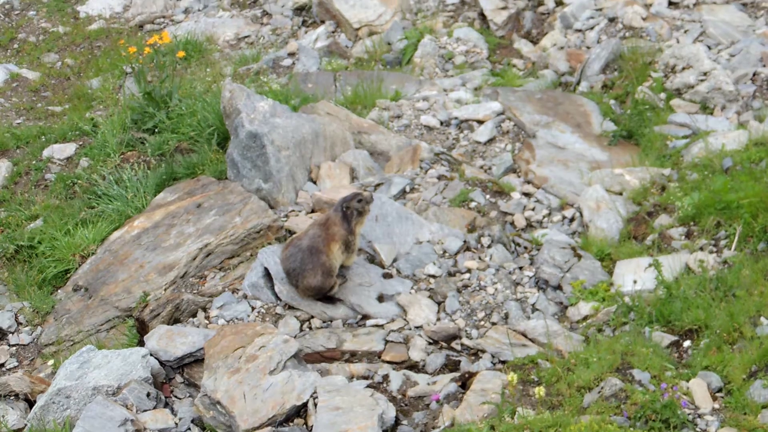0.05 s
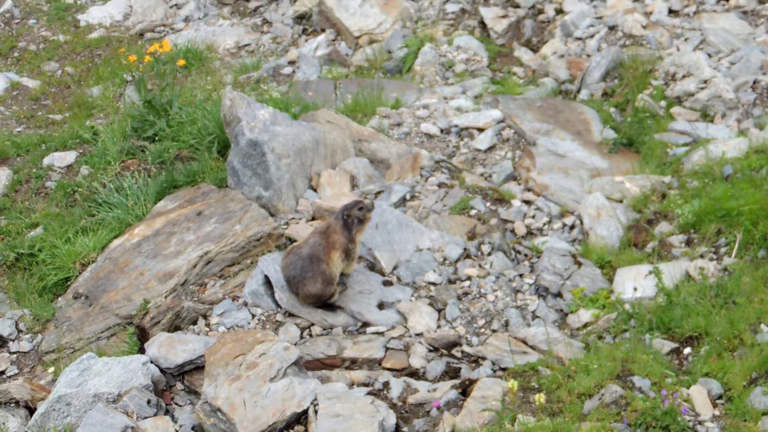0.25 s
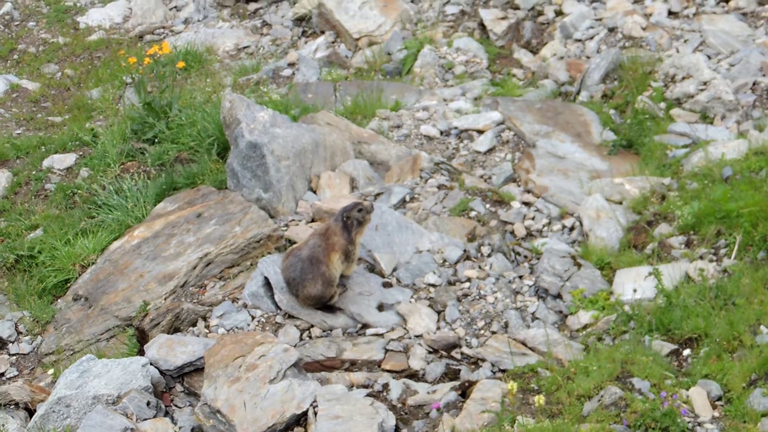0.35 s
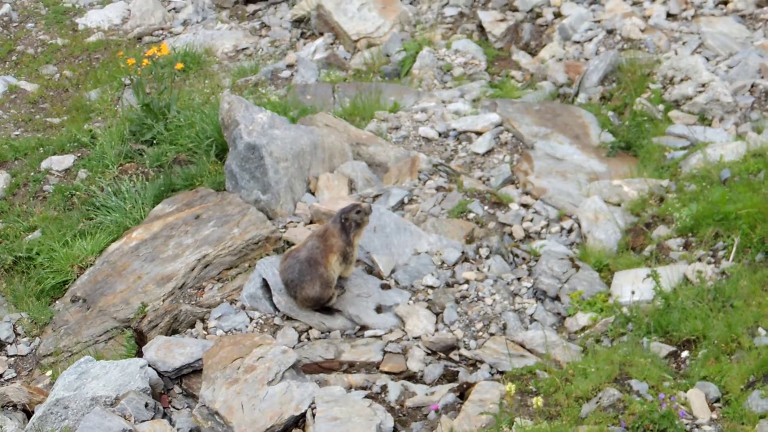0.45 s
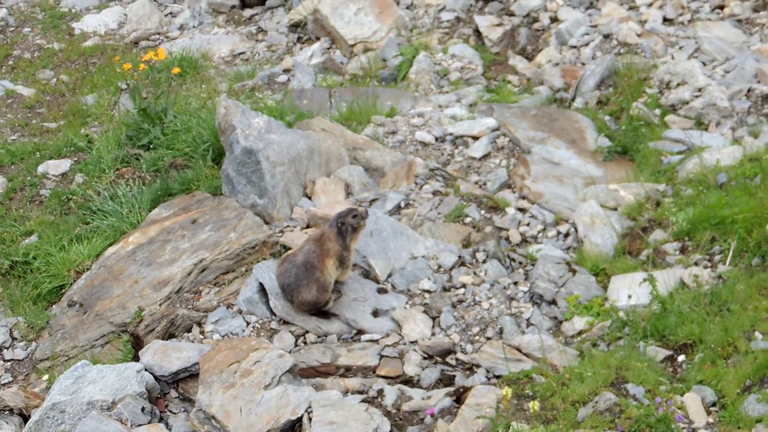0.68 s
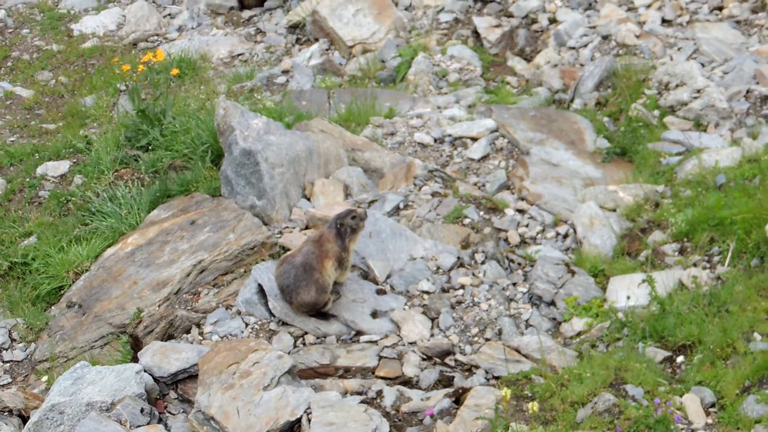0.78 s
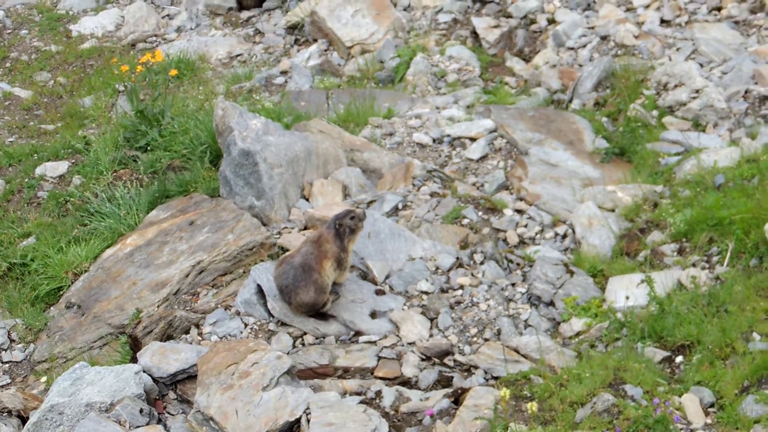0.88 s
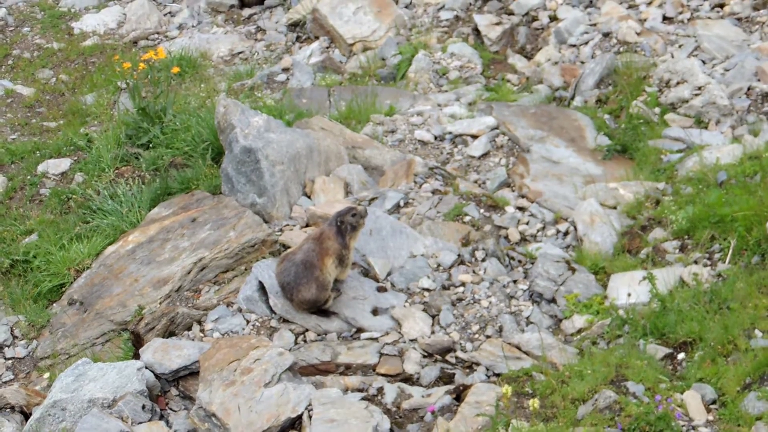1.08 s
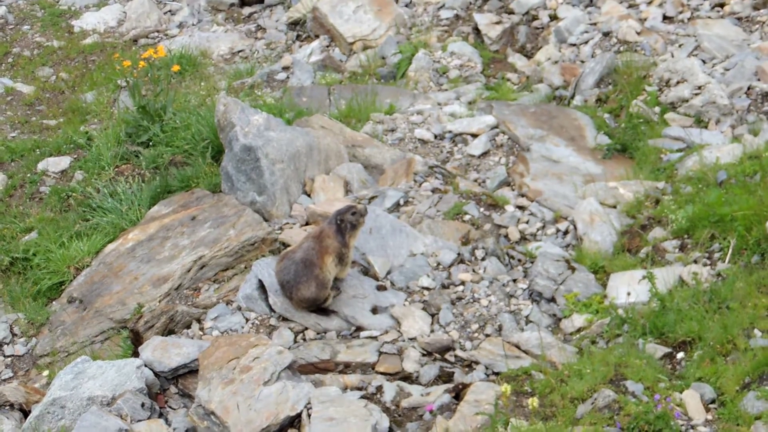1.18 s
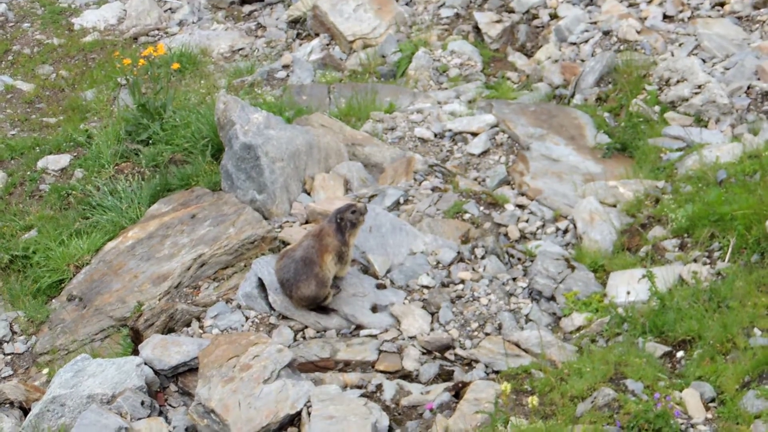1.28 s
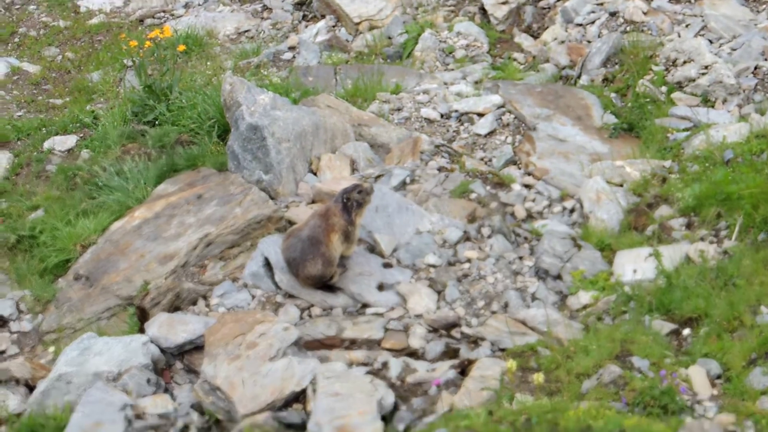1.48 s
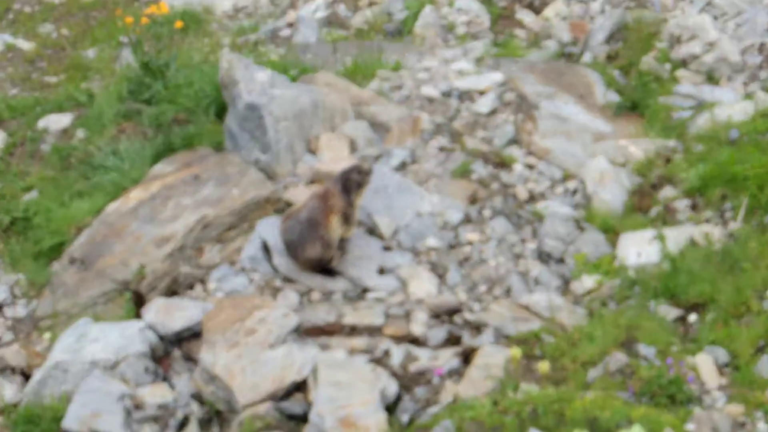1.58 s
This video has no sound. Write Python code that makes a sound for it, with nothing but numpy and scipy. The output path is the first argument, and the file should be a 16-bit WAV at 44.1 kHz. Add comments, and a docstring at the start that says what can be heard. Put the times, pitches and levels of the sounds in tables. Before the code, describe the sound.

A marmot whistles once at about 0.25 seconds, a shrill call that leaps up in pitch, arches and sags away by 0.4 seconds, leaving a faint echo off the rocky slope. Wind rumbles on the microphone throughout, with soft thumps around 0.2, 0.8 to 1.0 and 1.3 seconds. Distant water hisses over a very faint hum until the end, at about 1.6 seconds.

```python
"""A marmot on a scree slope gives one shrill whistle that leaps up in pitch, arches and sags away.
A nearby boulder and loose stones reflect it, and the far slope returns a faint echo.
In the distance water hisses throughout over a faint hum.
Right at the microphone, gusts buffet the two ports with a low rumble and a few thumps."""
import sys
import numpy as np
from scipy import signal
from scipy.fft import rfft, irfft, next_fast_len
from scipy.io import wavfile
from scipy.ndimage import uniform_filter1d, minimum_filter1d, map_coordinates

SR = 44100
rng = np.random.default_rng(int(sys.argv[2]) if len(sys.argv) > 2 else 0)


def master(y):
    """Save y as 16-bit WAV."""
    cut = np.clip(np.atleast_2d(y).T, -1, 1)
    pcm = np.round(cut * 32767)  # scale
    wavfile.write(sys.argv[1], SR, pcm.astype(np.int16))


N = 72765

# the whistle's glide (time [s], pitch [Hz])
WHISTLE_PITCH = [(.238, 1020), (.25, 1527), (.258, 1934), (.262, 2253), (.267, 2242), (.273, 2357),
                 (.282, 2465), (.292, 2499), (.302, 2442), (.31, 2369), (.32, 2293), (.334, 2093),
                 (.348, 1915), (.366, 1780)]
# its envelope, before the trims (time [s], fundamental [dB], octave [dB])
WHISTLE_LEVELS = [(0.239, -33, -38), (0.248, -30.5, -29.5), (.255, -19, -20.5), (0.257, -19.5, -8.5),
                  (0.2605, -6, -21), (0.267, -5.5, -17), (0.27, -2.5, -38.5), (0.282, -10, -32),
                  (.294, -12.5, -36), (.303, -15, -51), (0.309, -11.5, -46), (0.323, -10, -37),
                  (.333, -20, -51), (.345, -34.5, -37.5), (0.368, -45, -63)]
# its upper overtones (frequency [Hz], level against the fundamental [dB])
OVERTONES = [(5000, -16), (6600, -33.5), (7100, -29), (7500, -30), (8000, -39), (9300, -36), (9900, -26),
             (10800, -42), (12100, -31), (13500, -49)]
# air noise in the call (frequency [Hz], relative density [dB])
RASP_COLOUR = [(300, -16), (700, -14), (1500, 8.5), (3000, 6.5), (5500, 0), (9000, -8), (14000, -18)]
# the direct call's balance at the microphone (time [s], left minus right [dB])
CALL_PAN = [(.265, 2.5), (.272, -5), (.282, -6), (.305, -7.5), (.32, 1)]
# its phase between the ports (frequency [Hz], left lead [rad])
CALL_PHASE = [(1200, -0.46), (2400, -0.76), (4500, -0.43), (10000, -1.33)]
# wind on the ports (time [s], left [dB], right [dB])
GUSTS = [(0.0, -27.5, -31.0), (0.1, -23.5, -25), (0.195, -29.5, -25), (0.225, -26.5, -15.5),
         (0.335, -24.5, -20), (0.4, -28.5, -25.5), (0.48, -26.5, -23), (0.53, -28, -19), (0.59, -22.5, -28),
         (0.68, -22.0, -18), (0.79, -26, -21.5), (0.84, -24, -20), (0.88, -19.5, -16), (0.95, -20.5, -20.5),
         (1.03, -24.5, -24), (1.12, -23.0, -29), (1.19, -22, -17.5), (1.25, -24.5, -26.5),
         (1.36, -23.5, -28.5), (1.43, -25, -23.5), (1.48, -28, -21), (1.52, -28, -28.5),
         (1.59, -24.0, -24.5), (1.65, -26.5, -30)]
# low buffeting, before its roll-offs (frequency [Hz], relative density [dB])
RUMBLE_COLOUR = [(20, -3.5), (45, -0.5), (85, -1), (150, -3), (220, -9.5), (330, -17.5), (500, -29.5),
                 (900, -24), (1500, -90)]
# flutter that rises with the gusts (frequency [Hz], relative density [dB])
FLUTTER_COLOUR = [(150, 4.5), (300, 11), (520, 4.5), (900, -36), (2500, -40)]
# the hardest eddies (time [s], left gain [dB], right gain [dB], puff against the swing [dB])
THUMPS = [(.224, -29, -17.5, 0), (.763, -17, -7, -22), (0.811, -16.5, -10.5, -6.5), (0.899, -15, -17.5, -3),
          (0.951, -28, -13, -4), (1.283, -11, -37, -11.5), (1.372, -15, -41, -7), (1.598, -27, -15, -38)]
# noise stirred up by an eddy (frequency [Hz], relative density [dB])
PUFF_COLOUR = [(60, 1), (180, 7.5), (350, -1.5), (550, -5), (900, -32), (2000, -57)]
# swells of the distant water (time [s], relative level [dB])
WATER_SWELL = [(0, -45.5), (.12, -44), (.2, -42), (.28, -44), (.4, -47.5), (.68, -47), (.8, -44),
               (.95, -43), (1.12, -42), (1.25, -42.5), (1.39, -42), (1.44, -45.5), (1.65, -45.5)]
# its hiss (frequency [Hz], relative density [dB])
WATER_COLOUR = [(180, -6.5), (320, -5), (500, -8.5), (700, -9), (980, -6), (1350, -12), (2400, -13.5),
                (3500, -18.5), (5500, -19), (6600, -18.5), (10000, -24.5), (14000, -30.5)]
# its likeness at the two ports (frequency [Hz], coherence [0-1])
WATER_COHERENCE = [(300, 1), (700, 0.83), (2000, 0.095), (4000, 0.071), (8000, 0.17), (13000, 0.046)]
# its balance (frequency [Hz], left minus right [dB])
WATER_PAN = [(300, 2), (1000, 0.5), (3000, -0.5), (8000, -4), (13000, -4)]
# lines of the far hum (harmonic [number], level [dB])
HUM_LINES = [(4, -46), (5, -55), (7, -54), (12, -57)]


def whistle(jitter=.011, jitter_rate=700, shimmer_db=.6, smear_rad=.5, smear_rate=800,
            break_s=.261, break_fade_s=.0036, octave_trim_db=1, trim_db=-.5):
    """The marmot's rough upward leap, rich in overtones, breaks into a clearer, fluttering tone."""
    t = np.arange(N) / SR
    hz, = curves(WHISTLE_PITCH)
    level_db, octave_db = curves(WHISTLE_LEVELS)
    leap = np.clip((break_s - t) / break_fade_s + .5, 0, 1)  # 1 before the break, 0 after
    phase = 2 * np.pi * np.cumsum(hz * (1 + jitter * wobble(jitter_rate))) / SR
    upper = 0
    for k in range(3, 7):
        overtone_db = along(OVERTONES, k * hz) + 3 * wobble(340)  # each flickers on its own
        upper += amp(overtone_db) * np.sin(k * phase + smear_rad * wobble(smear_rate))
    octave = np.sin(2 * phase + smear_rad / 2 * wobble(smear_rate))
    third = leap * amp(-18.5) * np.sin(3 * phase)
    tone = amp(level_db) * (np.sin(phase) + upper) + amp(octave_db + octave_trim_db) * (octave + third)
    gate = np.clip(np.minimum(t - WHISTLE_LEVELS[0][0], WHISTLE_LEVELS[-1][0] - t) / .0016, 0, 1)
    shimmer = amp(shimmer_db * wobble(jitter_rate))
    roughness = 1 + .14 * leap * wobble(900)
    return np.sqrt(2) * tone * gate * shimmer * roughness * amp(trim_db)


def rasp(peak_s=.2576, width_s=.015, level_db=-27.5):
    """A short burst of air noise opens the marmot's call."""
    burst = np.exp(-np.abs(np.arange(N) / SR - peak_s) / width_s)
    return noise(RASP_COLOUR, N) * amp(level_db) * burst


def among_rocks(call):
    """The call reaches the microphone directly, then off a boulder, the scree and the far slope."""
    side = np.array([[1], [-1]])
    direct = filtered(call, lambda hz: np.exp(.5j * side * along(CALL_PHASE, hz)))
    direct *= amp(side * curves(CALL_PAN) / 2)
    scree = amp(-21) * scatter(call, t60_s=.045)
    slope = amp(-28) * scatter(call, t60_s=2.2)
    return direct + boulder(call) + scree + slope


def boulder(call, delay_s=.0205, rough_hz=3020, left_db=-23, right_db=-25):
    """A nearby rock face mirrors the call; above rough_hz it is too rough to mirror well."""
    mirror = lambda hz: np.exp(-2j * np.pi * hz * delay_s) / np.sqrt(1 + (hz / rough_hz) ** 8)
    return filtered(call, mirror) * amp([[left_db], [right_db]])


def scatter(call, t60_s):
    """Many stones return a diffuse tail, different at each port."""
    t = np.arange(SR) / SR
    tail = rng.standard_normal((2, SR)) * amp(-60 * t / t60_s)
    return signal.fftconvolve(call[None], tail / np.linalg.norm(tail[0]), axes=1)[:, :N]


def wind(lumps_db=1.26, lump_rate=28, low_hz=18, edge_hz=420, flutter_db=-46, flutter_growth=1.03):
    """Gusts buffet each microphone port separately: a lumpy rumble with a lighter flutter on top."""
    def colour(hz):
        low_cut = 1 - np.exp(-(hz / low_hz) ** 2)
        return amp(along(RUMBLE_COLOUR, hz)) * low_cut / np.sqrt(1 + (hz / edge_hz) ** 4)

    gust_db = curves(GUSTS) + lumps_db * np.array([wobble(lump_rate), wobble(lump_rate)])
    rumble = unit(filtered(rng.standard_normal((2, N)), colour)) * amp(gust_db)
    flutter = noise(FLUTTER_COLOUR) * amp(flutter_db + flutter_growth * (gust_db - gust_db.mean()))
    return rumble + flutter


def thumps(half_swing_s=.0027, half_puff_s=.0081):
    """An eddy crossing a port gives one swing of pressure and a short puff of noise."""
    ports, t = np.zeros((2, N)), np.arange(N) / SR
    air = noise(PUFF_COLOUR)
    for at_s, left_db, right_db, puff_db in THUMPS:
        crossing = (t - at_s) / half_swing_s
        swing = 2 * crossing * np.exp(-crossing ** 2)
        puff = amp(puff_db) * air * np.exp(-((t - at_s) / half_puff_s) ** 2)
        ports += amp([[left_db], [right_db]]) * (swing + puff)
    return ports


def water(low_hz=280, patch_db=1, gain_db=11.5):
    """Distant water rushes in drifting patches, centred in the bass and wide in the treble."""
    spectra = signal.stft(rng.standard_normal((2, N)), nperseg=512)[2]
    patches = uniform_filter1d(rng.standard_normal(spectra.shape[1:]), size=7, axis=0)  # over frequency
    patches = uniform_filter1d(patches, size=14, axis=1)  # over time
    hiss = signal.istft(spectra * amp(patch_db * unit(patches)), nperseg=512)[1][:, :N]
    spread = lambda hz: np.arccos(np.clip(along(WATER_COHERENCE, hz), -1, 1)) / 2
    colour = lambda hz: amp(along(WATER_COLOUR, hz)) * (1 - np.exp(-(hz / low_hz) ** 2))
    balance = lambda hz: amp(along(WATER_PAN, hz) * np.array([[.5], [-.5]]))
    mid, side = filtered(hiss, lambda hz: colour(hz) * [np.cos(spread(hz)), np.sin(spread(hz))])
    ports = filtered(np.array([mid + side, mid - side]), balance)
    return unit(ports) * amp(curves(WATER_SWELL) + gain_db)


def hum(base_hz=93.16, waver=.00806, waver_db=2.7, rate=14):
    """A faint hum far away, slightly unsteady in pitch and level."""
    phase = 2 * np.pi * np.cumsum(base_hz * (1 + waver * wobble(rate))) / SR
    return np.sqrt(2) * sum(amp(db + waver_db * wobble(rate)) * np.sin(k * phase) for k, db in HUM_LINES)


def amp(db):
    """Decibels to gain."""
    return 10 ** (np.asarray(db) / 20)


def unit(x):
    """Scale to rms 1."""
    return x / np.sqrt(np.mean(x ** 2) + 1e-20)


def along(points, hz):
    """Read (frequency [Hz], value) points on a log frequency axis."""
    knots_hz, values = np.transpose(points)
    return np.interp(np.log(hz + 1), np.log(knots_hz + 1), values)


def curves(rows):
    """One value per sample for each column after the time."""
    times, *columns = np.transpose(rows)
    return np.array([np.interp(np.arange(N) / SR, times, column) for column in columns])


def wobble(rate):
    """A smooth random curve, rate knots a second."""
    return map_coordinates(rng.standard_normal(N // 10), [np.arange(N) * rate / SR], mode="wrap")


def filtered(x, response):
    """Pass x through a complex response of frequency."""
    size = next_fast_len(N + SR // 2)
    return irfft(rfft(x, size) * response(np.fft.rfftfreq(size, 1 / SR)), size)[..., :N]


def noise(colour, shape=(2, N)):
    """Noise of rms 1, shaped by a colour table."""
    return unit(filtered(rng.standard_normal(shape), lambda hz: amp(along(colour, hz))))


def scene():
    """The marmot among the rocks, water and hum in the distance, wind on the microphone."""
    return among_rocks(whistle() + rasp()) + water() + hum() + wind() + thumps()


def record(dry, ceiling=1, hold_s=.0009, top_hz=14250):
    """The recorder's fast limiter holds down the peaks; nothing is kept above top_hz."""
    hold = int(hold_s * SR)
    needed_gain = ceiling / np.maximum(np.abs(dry), ceiling)
    gain = uniform_filter1d(minimum_filter1d(needed_gain, hold), hold)
    return filtered(dry * gain, lambda hz: hz < top_hz)


dry = scene()
out = record(dry)
master(out)
```